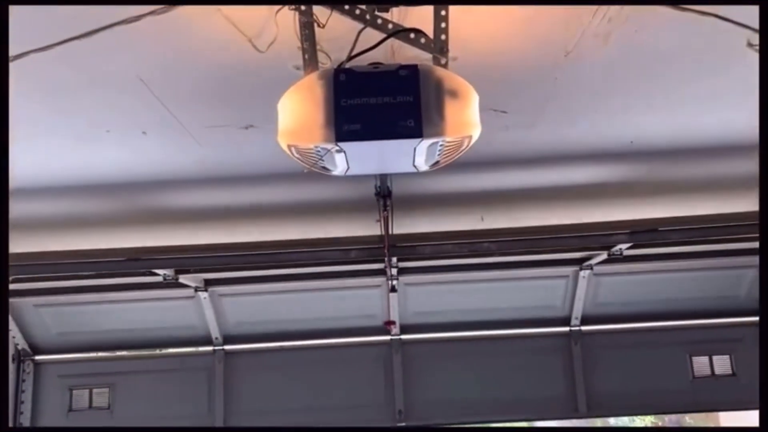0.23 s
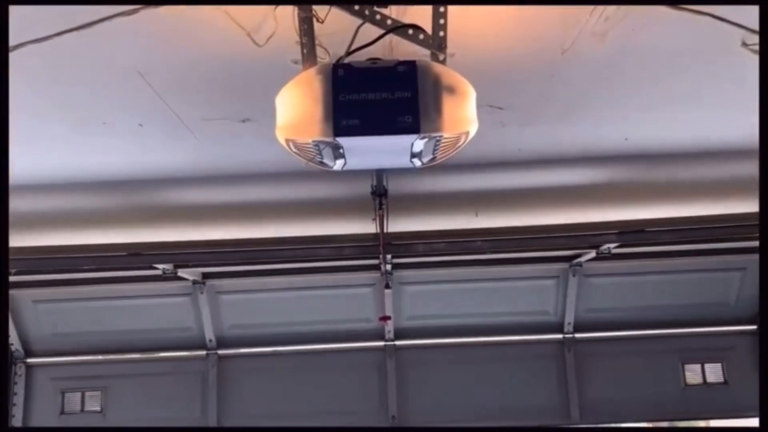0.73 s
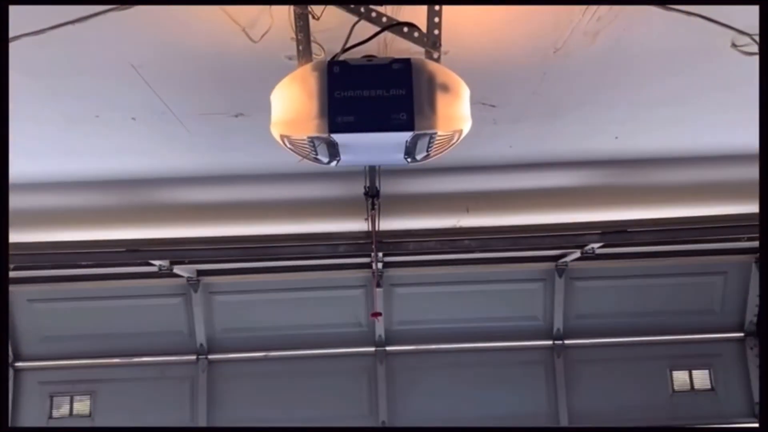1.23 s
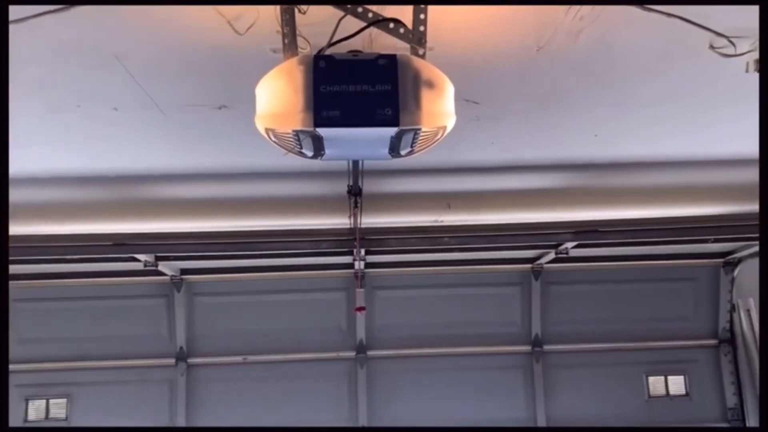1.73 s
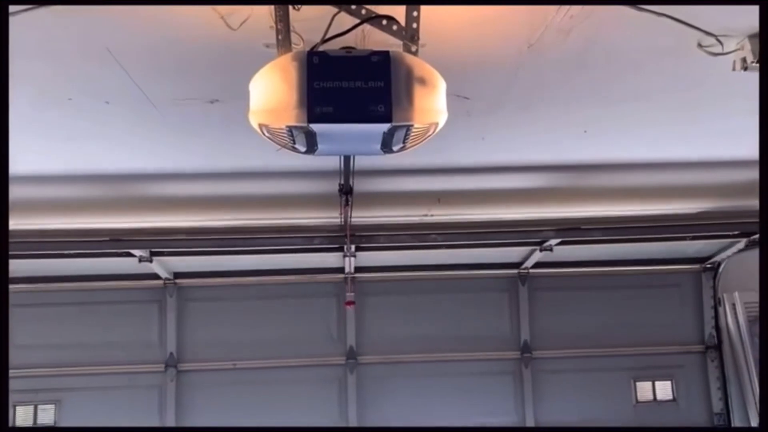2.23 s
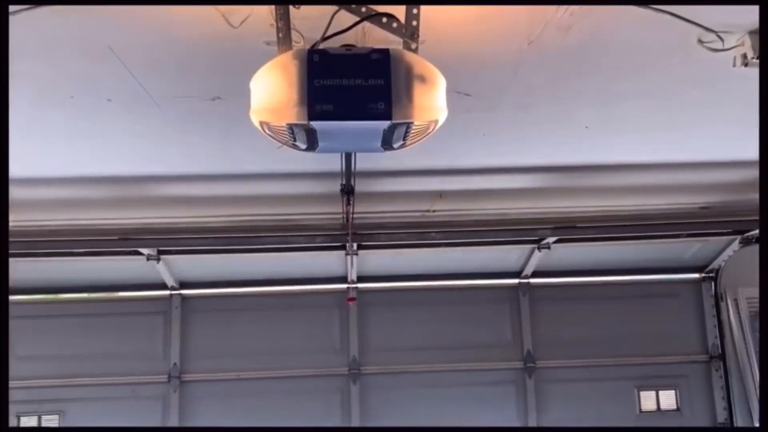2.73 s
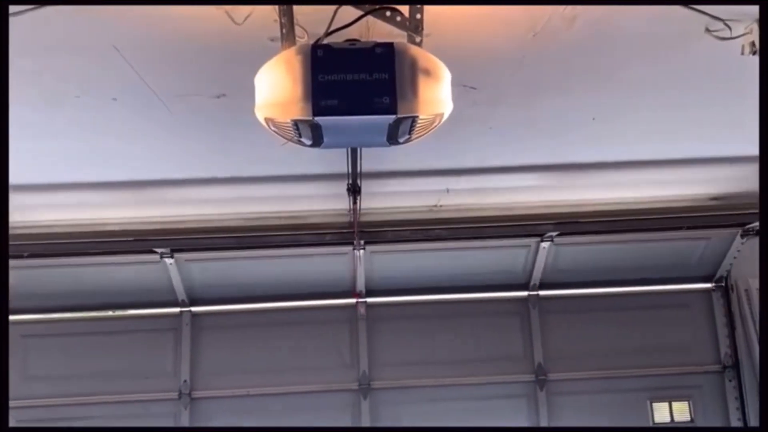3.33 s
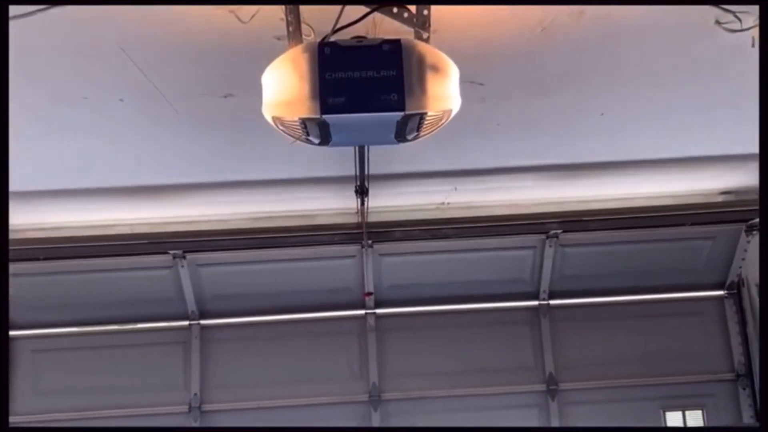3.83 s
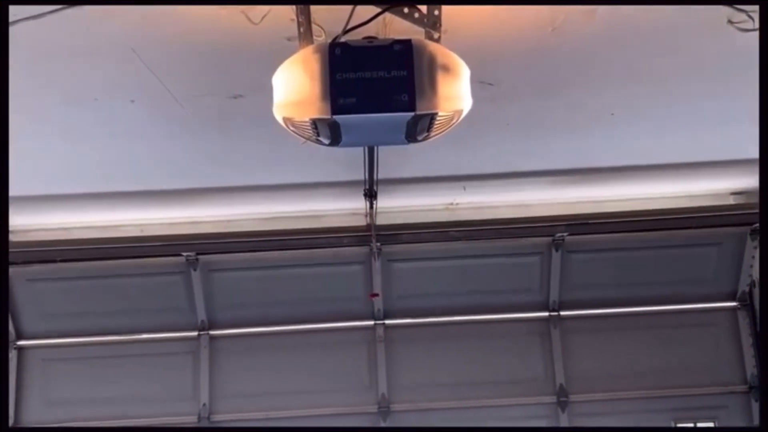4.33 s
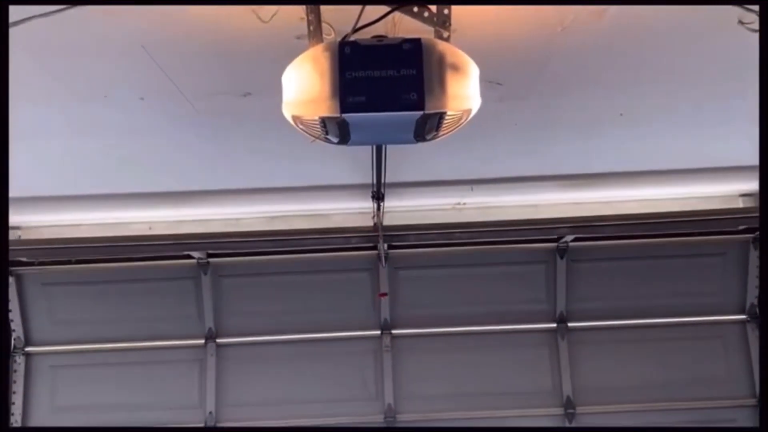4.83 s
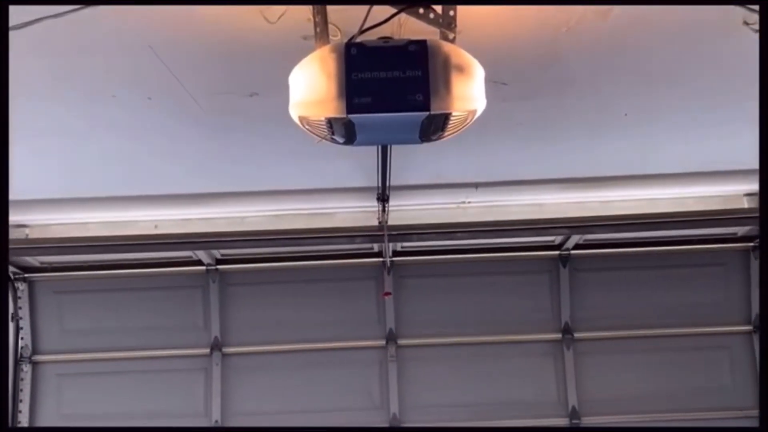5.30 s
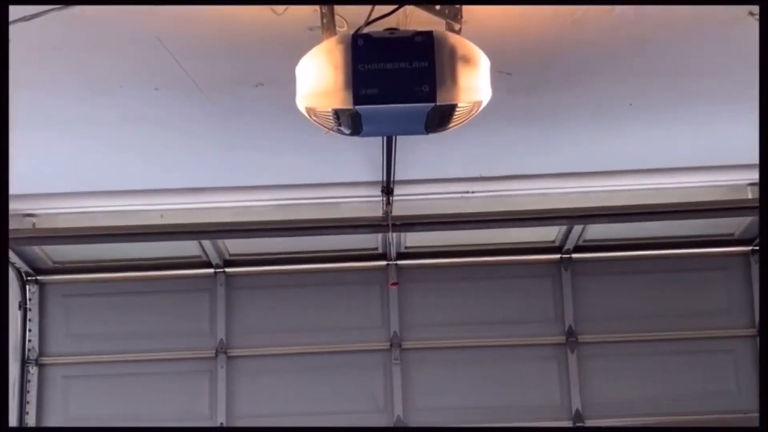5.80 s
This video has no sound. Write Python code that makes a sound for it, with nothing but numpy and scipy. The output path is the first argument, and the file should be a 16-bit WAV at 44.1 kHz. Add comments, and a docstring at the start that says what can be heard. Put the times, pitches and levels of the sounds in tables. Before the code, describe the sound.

Inside an echoing garage, a motor's mains hum and a rolling, gritty rumble continue from start to end. Light clicks and thuds come first, then a clank at 1.6 seconds, a loud ringing clatter around 2.4 and a sharp metallic bang near 3.2. Later knocks are quieter until a small cluster near the end. Dry rollers squeak faintly; a stereo phone captures it from below.

```python
"""A motor hum and a rolling rumble run throughout, with a faint roller whistle: a ceiling-mounted opener lowers a
sectional steel door in a closed garage. The hum is a stack of multiples of twice the mains frequency, the travel is
coloured noise. Hinges, fittings and panels clank as each section turns into the upright track: noise bursts and
decaying modes, ringing on in the room. A phone with two microphone ports listens from below."""
import sys
import numpy as np
from scipy import signal
from scipy.fft import rfft, irfft, next_fast_len
from scipy.io import wavfile
from scipy.ndimage import uniform_filter1d, map_coordinates

SR = 44100
rng = np.random.default_rng(int(sys.argv[2]) if len(sys.argv) > 2 else 0)


def master(y):
    """Save y as 16-bit WAV."""
    cut = np.clip(np.atleast_2d(y).T, -1, 1)
    pcm = np.round(cut * 32767)  # scale
    wavfile.write(sys.argv[1], SR, pcm.astype(np.int16))


N = 267201

# Modes of a hinge pin. Each row: frequency in Hz, relative level in dB, t60 in seconds.
PIN = [(2577, 0, .15), (2214, -9, .15), (4520, -6, .07)]


def amp(db):
    """dB to gain."""
    return 10 ** (np.asarray(db) / 20)


def unit(x):
    """x at rms 1."""
    return x / np.sqrt(np.mean(x ** 2) + 1e-20)


def along(points, hz):
    """Values at hz, read from (Hz, value) points on a log frequency axis."""
    f, v = np.transpose(points)
    return np.interp(np.log(hz + 1), np.log(f + 1), v)


def curves(rows):
    """One value per sample for each column after the time."""
    s, *cols = np.transpose(rows)
    return [np.interp(np.arange(N) / SR, s, c) for c in cols]


def wobble(rate):
    """A smooth random curve, rate knots a second."""
    knots = rng.standard_normal(int(N * rate / SR) + 4)
    return map_coordinates(knots, [np.arange(N) * rate / SR])


def swell(start, length, edge):
    """Rises, holds and fades between 0 and 1 (times in seconds)."""
    t = np.arange(N) / SR - start
    rise, fall = t / edge + .5, (length - t) / edge + .5
    return np.clip(np.minimum(rise, fall), 0, 1) ** 2


def coloured(x, spectrum):
    """x through a (Hz, dB) spectrum, at rms 1."""
    n = x.shape[-1]
    m = next_fast_len(n + 2048)
    gain = amp(along(spectrum, np.fft.rfftfreq(m, 1 / SR)))
    return unit(irfft(rfft(x, m) * gain, m)[..., :n])


def rush(spectrum, patchy_db):
    """Two unrelated noises of one colour, sharing patches of random gain in time and frequency."""
    z = signal.stft(rng.standard_normal((2, N)), nperseg=512)[2]
    field = uniform_filter1d(rng.standard_normal(z.shape[1:]), 6, 0)
    field = uniform_filter1d(field, 12, 1)
    patchy = signal.istft(z * amp(patchy_db * unit(field)), nperseg=512)[1][:, :N]
    return coloured(patchy, spectrum)


def ringing(modes, t, scatter_db):
    """Decaying modes, each at a new strength."""
    hz, db, t60 = np.transpose(modes)[:, :, None]
    level_db = db + rng.normal(0, scatter_db, hz.shape)
    return np.sum(amp(level_db - 60 * t / t60) * np.sin(2 * np.pi * hz * t), axis=0)


def garage(length):
    """A fresh pair of room tails; each frequency dies at its own speed."""
    # Decay of the garage. Each row: frequency in Hz, t60 in seconds.
    decay = [(60, 0.99), (300, 0.95), (1000, 0.48), (3000, 0.45), (8000, 0.28), (15000, 0.26)]
    hz, t, z = signal.stft(rng.standard_normal((2, length)), SR, nperseg=256)
    fading = z * amp(-60 * t / along(decay, hz)[:, None])
    tail = signal.istft(fading, SR, nperseg=256)[1][:, :length]
    return tail / np.linalg.norm(tail[0])


def motor():
    """Magnetic pull shakes the housing at multiples of twice the mains, in step; the drive adds a gliding tone."""
    # The hum. Each row: time in seconds, mean levels of the 1st, 2nd and 3rd multiple in dB.
    hum_levels = [(0.0, -33, -45, -40), (0.05, -37, -47.5, -38), (0.74, -39, -46, -38),
                  (0.89, -36, -55, -41), (1.23, -43.5, -45, -41), (1.37, -39, -57, -41.5),
                  (1.47, -68, -51, -43.5), (1.69, -35.5, -49, -42.5), (1.82, -45, -50, -45.5),
                  (2.38, -46, -48.5, -44), (2.45, -52, -44, -41.5), (2.58, -49, -69, -43),
                  (2.83, -42, -52, -46), (2.92, -47.5, -53, -42.5), (3.14, -39.5, -50, -40),
                  (3.19, -35, -67, -44), (3.31, -40.5, -41.5, -49.5), (3.49, -41, -72, -40.5),
                  (3.73, -43, -47, -48), (3.9, -39, -52.5, -53.5), (4.51, -43.5, -57, -40.5),
                  (4.94, -41.5, -44.5, -47.5), (5.06, -36, -53, -43), (5.18, -46, -48, -48.5),
                  (5.47, -40, -54, -48.5), (5.6, -53, -69, -50.5), (5.75, -38, -63, -39),
                  (5.96, -65, -50, -52), (6.01, -48, -58, -55), (6.06, -55, -66, -53)]
    # The faint tone of the drive. Each row: time in seconds, pitch in Hz, mean level in dB.
    whine = [(0, 311, -53), (.6, 316.5, -48.5), (1.15, 326, -58), (1.4, 326.6, -50.5), (3.2, 314, -60),
             (3.6, 317.6, -50), (4.1, 320, -53), (4.5, 330.4, -55), (4.8, 332.6, -57), (6.06, 332.7, -55)]
    hum_hz = 119.97
    turn = 2 * np.pi * hum_hz * np.arange(N) / SR + .3 * wobble(6)
    tones = []
    for multiple, db in enumerate(curves(hum_levels), start=1):
        size = amp(db + 1.03 * wobble(14))
        tones.append(size * np.cos(multiple * turn + 0.31 * wobble(8.9)))
    whine_hz, whine_db = curves(whine)
    whine_turn = 2 * np.pi * np.cumsum(whine_hz) / SR + 0.6 * wobble(10)
    tones.append(amp(whine_db + 2.8 * wobble(7.3)) * np.sin(whine_turn))
    return np.sqrt(2) * sum(tones) * np.array([[1], [0]])  # first arrival only


def travel():
    """Gears, trolley and rollers: rumble, drone of the rail, rolling and scraping in the tracks, hiss."""
    # The run of the door. Each row: time in seconds, then shaking of the rail, grip of the rollers,
    # scraping and hiss in dB, each before the trim of its layer.
    roll = [(0.0, -46, -48, -56, -61), (0.96, -42.5, -49, -52, -59), (1.27, -49.5, -48.5, -54.5, -60),
            (1.55, -40.5, -45, -49, -61), (1.69, -40, -45, -52, -57.5), (1.92, -45.5, -47.5, -54, -58.5),
            (2.19, -45, -48, -49, -57), (2.53, -42, -41, -47.5, -63), (2.82, -46.5, -47, -53, -59),
            (3.05, -42, -45.5, -46, -58.5), (3.22, -40, -43, -49.5, -64.5),
            (3.49, -41.5, -47.5, -53, -61.5), (3.95, -47.5, -51, -54.5, -61),
            (4.56, -45.5, -52, -57.5, -60.5), (4.91, -45, -51, -56.5, -59.5),
            (5.6, -49.5, -48.5, -51.5, -57.5), (5.8, -47, -43.5, -50.5, -57.5),
            (6.06, -40.5, -48, -48.5, -59)]
    # Colours of the five layers. Each row: frequency in Hz, relative density in dB per Hz.
    rumble_colour = [(16, -28), (26, -11), (45, -0.5), (65, 3), (95, 5.5), (112, 1), (170, -35.5)]
    drone_colour = [(70, -35), (110, -1.5), (135, 2), (175, -1.5), (205, -6), (270, -3), (292, -4.5),
                    (316, -4.5), (345, -6.5), (420, -15.5), (600, -19.5), (900, -58)]
    rolling_colour = [(200, -61), (400, 1), (520, -2), (700, -2.5), (850, -0.5), (1100, -3.5), (1500, -7.5),
                      (2400, -29)]
    scraping_colour = [(900, -30), (1500, -1.5), (1900, 3), (2300, -1.5), (2800, -3), (3400, -13),
                       (5500, -22)]
    hiss_colour = [(1500, -26), (3000, 2.5), (4300, -0.5), (5500, -3.5), (6300, 0), (8000, 1), (10000, 2.5),
                   (11500, -2.5), (13500, -0.5), (16500, -4.5)]
    rumble_follows = 0.66  # dB per dB of the rail
    rail_db, grip_db, scraping_db, hiss_db = curves(roll)
    shake = rail_db - rail_db.mean()
    judder = wobble(12)  # uneven travel shakes the brighter layers together
    rumble_db = -46.5 + rumble_follows * shake + 0.31 * wobble(5.14)
    rumble = amp(rumble_db) * rush(rumble_colour, patchy_db=-0.3)
    drone = amp(rail_db + 1.23 + 0.51 * wobble(15.0)) * rush(drone_colour, patchy_db=1.0)
    rolling = amp(grip_db + 2.0 + 0.5 * judder) * rush(rolling_colour, patchy_db=2.0)
    scraping = amp(scraping_db + 1.1 + 0.19 * judder) * rush(scraping_colour, patchy_db=3.0)
    flicker_db = 0.12 * judder + 1.56 * wobble(21.95)
    hiss = amp(hiss_db + 7.5 + flicker_db) * rush(hiss_colour, patchy_db=3.5)
    return rumble + drone + rolling + scraping + hiss


def whistle():
    """A dry roller straight ahead sings a thin gliding tone in uneven bursts, nearly in step at both ports."""
    # Pitch of the roller, climbing with each section and dropping back. Each row: time in seconds, pitch in Hz.
    glide = [(0, 897), (.35, 907), (.76, 925), (1.1, 975), (1.2, 997), (1.28, 1012), (1.45, 1020),
             (1.65, 1047), (1.8, 1036), (1.95, 1032), (2.1, 1048), (2.5, 1025), (2.6, 1000), (2.67, 1002),
             (2.76, 1030), (2.9, 1005), (3.0, 975), (3.47, 955), (3.53, 899), (4.08, 944), (4.35, 979),
             (4.6, 989), (4.92, 1021), (5.2, 1053), (5.55, 1062), (6.06, 1082)]
    # Faint steady levels of multiples 1 to 4, in dB.
    steady_db = -80, -74, -76, -73
    # One multiple sings out: a list for each of multiples 1 to 4.
    # Each row: start in seconds, length in seconds, level in dB.
    squeaks = [
        [(4.04, .22, -57.5), (5.6, 0.5, -54)],
        [(-.03, .45, -58), (.44, .38, -65), (3.48, 0.13, -60), (4.1, .22, -66), (4.4, .16, -67),
         (5.26, .12, -67)],
        [(.62, 0.097, -63), (3.4, 0.064, -58), (4.38, .2, -68.5), (4.725, .065, -59)],
        [(1.19, .1, -61.5), (1.3, .08, -68), (1.44, 0.12, -73), (1.68, .07, -69), (1.77, .22, -64),
         (2.02, 0.23, -73), (2.55, .12, -60), (2.7, 0.11, -66), (2.88, 0.13, -66), (4.3, 0.047, -71),
         (4.63, .035, -59), (4.69, 0.1, -60.5), (4.8, 0.16, -65), (5.02, 0.1, -69), (5.16, .04, -63),
         (5.32, 0.17, -68), (5.485, 0.054, -57), (5.545, 0.07, -64), (5.67, .08, -73), (5.9, .17, -67)],
    ]
    turn = 2 * np.pi * np.cumsum(curves(glide)[0]) / SR + .3 * wobble(50)
    sizes = []
    for db, rows in zip(steady_db, squeaks):
        bursts = sum(amp(loud_db) * swell(s, length, edge=.03) for s, length, loud_db in rows)
        sizes.append(amp(db) + bursts)

    def at_port():
        """The multiples with this port's own small wavering of level and phase."""
        tones = 0
        for multiple, size in enumerate(sizes, start=1):
            wavering = amp(.9 * multiple * wobble(45))
            tones = tones + size * wavering * np.sin(multiple * (turn + .15 * wobble(12)))
        return np.sqrt(2) * tones

    return np.array([at_port() for _ in range(2)])


def booms():
    """The whole door leaf and the air of the garage sound deep, unsteady notes."""
    # Deep notes. Each row: start in seconds, length in seconds, pitch in Hz, mean level in dB.
    deep_notes = [(0.03, 0.61, 77.4, -41), (0.816, 0.13, 77, -38), (1.228, 0.12, 94.5, -38),
                  (1.58, 0.21, 90, -48), (1.68, 0.32, 53, -44), (2.404, 0.18, 90.2, -45),
                  (2.485, 0.095, 77, -39), (2.6, 0.12, 175, -39), (2.592, .11, 289.8, -35),
                  (4.1, 0.13, 247.7, -42.5), (2.55, 0.54, 52.6, -42), (3.1, .15, 86.8, -40),
                  (3.5, 0.2, 53, -44), (4.22, 0.12, 77.7, -47), (5.88, 0.18, 89.7, -43)]
    t = np.arange(N) / SR
    notes = 0
    for s, length, hz, db in deep_notes:
        size = amp(db + 0.76 * wobble(7.9)) * swell(s, length, edge=0.15)
        notes = notes + size * np.sin(2 * np.pi * hz * t + 0.93 * wobble(8.2))
    return np.sqrt(2) * notes * np.array([[1], [0]])  # first arrival only


def knocks():
    """Each knock is a short rattle that shakes the parts of the door and its modes, heard mostly through the room."""
    # Knocks of the door. Each row: start in seconds, clank strength in dB, then thud, panel, hinge, edge
    # and jingle in dB against the clank, all before the trims below.
    strikes = [(0.2577, -42, -4, 13, 4, 1, -5.5), (0.3, -41.5, 16, 12.5, 2, -10, -21),
               (0.405, -45.5, 2, 6, 6, -4, -15), (0.7855, -40.5, 6, 6.5, -3, 2.5, 3),
               (0.8049, -37.5, 1, 1, -8, -6, -19), (0.978, -40, -3, -11, -9, -4.5, -7),
               (1.1778, -40, 10, 8, 0, -4, -4), (1.3789, -38, -7, -3, -17, -24, -13),
               (1.61, -33, -5, -1, -4, -1.5, -9.5), (1.6193, -30, 6.5, 0, -9, -9, -18),
               (1.6587, -48, 16, 10, -9, -8, -8), (1.699, -46, 0, 12, 2, -4, -23),
               (1.8179, -48, 16, -2, 0, 6.5, -18), (2.1266, -37, 1, 4.5, -15, -23, -25),
               (2.2875, -36.5, 1, 0, 0, -14, -31), (2.353, -37, -10, -6, 0, 5, -10),
               (2.3731, -25.5, -3.5, 6.5, 0, -9, -24), (2.3925, -27.5, -12, 2, -9, -4, -29),
               (2.4088, -29.5, 12.5, 1, -2.5, -6, -26), (2.4598, -34, 10, 12, -12, -6, -26),
               (2.5389, -43, 2, 15, -1, 0, -25), (2.6183, -35.5, 15.5, 6.5, -3, -12, -31),
               (2.651, -37.5, 13, 4, -2, -6, -29), (2.789, -38, 7, -3, -4, -2.5, -8.5),
               (3.0884, -45, 20.5, 12.5, -11, 7, -25), (3.178, -34, -7, 1, 2, 1, -16),
               (3.197, -24, -9, -2.5, -15, -5, -18), (3.2113, -30.5, -19, 5.5, -4, -3, -19),
               (3.226, -41, -5, 0, -8, -1, -15), (3.2441, -36, 7, -6, 0, -16, -22),
               (3.329, -41.5, -4, 9, -22, -2, -17), (3.6613, -34, 0, 5, -6, 1.5, -9),
               (3.7597, -46, 16, -5, 4.5, 4, 3.5), (3.8103, -44.5, -7, -4, 0, -5, -7),
               (4.1086, -45.5, 15, 8.5, -9, -1, -14), (4.5751, -47.5, 12, 13, 4, 7.5, -4),
               (4.5955, -39.5, -4, 9.5, -1.5, -3, -13), (5.1603, -45, -14, -13, -3, -10, -20),
               (5.2369, -34.5, -1, 6, -5, -3, -27), (5.5386, -47.5, 23, 3, 4, -9, -20),
               (5.685, -35, 6, -5, 4, -15, -20), (5.73, -38.5, 14, 11.5, 2, -8, -24),
               (5.755, -46, -2, 6, 0, -12, -22), (5.788, -38, 15.5, 8, 0, -10, -20),
               (5.83, -44, 12, 0, -7, -12, -22), (5.9004, -42, -7, -16, -6, -17, 0)]
    # Panel modes. Each row: frequency in Hz, relative level in dB, t60 in seconds.
    steel = [(840, -5, .2), (1098, -8, .2), (1184, -3, .15), (1421, -4, .2), (1480, -8, .2),
             (1606, -5, .15), (1735, -5, .15), (1850, -8, .2), (2020, -9, .2), (2443, -8, .2),
             (2816, -10, .2), (4033, -16, .15), (4430, -13, .12), (5024, -17, .15)]
    # Colours of the six parts. Each row: frequency in Hz, relative density in dB per Hz.
    thud = [(30, -42), (50, -4.5), (170, -7), (300, -3), (450, -23), (800, -63)]
    panel = [(250, -64), (480, -1.5), (900, -1), (1400, -4.5), (1900, -16), (3000, -41)]
    clank = [(900, -29), (1400, -0.5), (1700, 10.5), (2200, -1.5), (3200, -33)]
    hinge = [(1600, -46), (2250, 2.5), (2575, 1), (2850, -2), (3200, -7.5), (4200, -27)]
    edge = [(2400, -30), (3400, -1.5), (4500, -4.5), (5200, -5.5), (6500, -12.5), (9000, -20.5)]
    jingle = [(4500, -26), (7000, -1.5), (10000, 0), (13000, 0), (16500, 0)]
    parts = thud, panel, clank, hinge, edge, jingle
    decay_s, rise_s, grain_db = 0.015, 0.0017, 4  # grain: unevenness of the small contacts
    out, t = np.zeros((2, N + 2 * SR)), np.arange(SR // 4) / SR
    onset = 1 - np.exp(-t / rise_s)
    fade = np.exp(-t / decay_s) * onset
    for s, db, thud_db, panel_db, hinge_db, edge_db, jingle_db in strikes:
        levels = thud_db - 5.5, panel_db - 3.0, -.7, hinge_db + 0.5, edge_db - .8, jingle_db + 10.0
        grains = np.repeat(rng.standard_normal(len(t) // 100 + 1), 100)[:len(t)]
        contacts = fade * amp(grain_db * grains)
        rattle = 0
        for part, level in zip(parts, levels):
            rattle = rattle + amp(level) * coloured(contacts * rng.standard_normal(len(t)), part)
        rattle = fade.std() * rattle
        panel_modes = amp(-11) * ringing(steel, t, scatter_db=2.5)
        pin_modes = amp(hinge_db - 10.0) * ringing(PIN, t, scatter_db=2.0)
        blow = amp(db - 1.5) * (rattle + (panel_modes + pin_modes) * onset)
        heard = signal.fftconvolve(blow[None], garage(SR * 3 // 4), axes=1)
        heard[0, :len(t)] += amp(-6.5) * blow  # direct sound, in the first arrival only
        out[:, round(s * SR):][:, :heard.shape[1]] += heard
    return out[:, :N]


def clinks():
    """Fittings and hinge pins ring briefly, straight at both ports and again through the room."""
    # Small loose fittings, each at its own pitch. Each row: start in seconds, middle partial in Hz,
    # its typical level in dB, t60 in seconds.
    fittings = [(.268, 1100, -48, 0.073), (.282, 795, -38.5, 0.13), (.295, 2980, -46, 0.072),
                (.786, 8750, -48, .05), (.79, 13000, -46, .06), (.8, 10300, -50, .05),
                (1.611, 13500, -50, .05), (2.38, 1157, -31, 0.09), (2.38, 850, -31.5, 0.11),
                (2.39, 1620, -31, .08), (2.41, 1384, -31.5, 0.13), (5.16, 1730, -50, 0.12),
                (5.49, 1250, -46.5, .12), (1.611, 2853, -41, .07), (1.62, 2223, -43, .07),
                (1.631, 1174, -36.5, .15), (3.18, 2900, -41, .06), (3.203, 1674, -35, 0.11),
                (3.22, 1413, -32, .1), (3.204, 3850, -42, .1), (3.212, 6944, -42, .07),
                (3.221, 4430, -37, .1), (3.662, 4786, -46, 0.093), (3.663, 1567, -47, 0.13),
                (4.577, 2961, -51, .07), (4.578, 3750, -52, 0.055), (4.594, 4400, -46, .08),
                (4.594, 4720, -47, .1), (5.16, 2950, -48, 0.071), (5.24, 2950, -43, .06)]
    # A hinge pin is struck hard. Each row: start in seconds, level in dB.
    pings = [(2.352, -27.5), (2.372, -29), (5.55, -45), (5.69, -42), (5.78, -44)]
    spread, room_db, rise_s = 0.0196, -3, .003  # spread: relative detuning of the three partials
    out, t = np.zeros((2, N + 2 * SR)), np.arange(SR // 4) / SR
    rings = []
    for s, hz, db, t60 in fittings:
        partials = [(hz * (1 + spread * step), db - 5 * abs(step), t60) for step in (-1, 0, 1)]
        rings.append((s, ringing(partials, t, scatter_db=4.0)))
    for s, db in pings:
        rings.append((s, amp(db) * ringing(PIN, t, scatter_db=3.5)))
    for s, ring in rings:
        ring = ring * (1 - np.exp(-t / rise_s))
        heard = amp(room_db) * signal.fftconvolve(ring[None], garage(SR // 2), axes=1)
        heard[:, :len(t)] += ring
        out[:, round(s * SR):][:, :heard.shape[1]] += heard
    return out[:, :N]


def ports(arrivals):
    """Two unrelated arrivals of the room sound are mixed into two channels that share the bass and differ above it."""
    # Correlation of the two channels. Each row: frequency in Hz, correlation from 0 to 1.
    alike = [(30, .92), (60, 1), (250, 0.93), (400, 0.64), (520, 0.54), (800, 0.2), (1300, 0.48),
             (1650, 0.33), (2400, 0.22), (3300, 0.042), (4500, 0.037), (5900, 0.24), (7300, 0.063),
             (7800, 0.98), (8600, 1), (9400, 0.74), (10300, 0.76), (10800, 0.55), (11600, 0.77),
             (12100, 0.53), (12950, 0.91), (13800, .99), (14600, 0.52), (15300, 0.5)]
    # Balance of the channels. Each row: frequency in Hz, left minus right in dB.
    lean = [(50, 2.5), (100, -4), (200, -2), (400, 0), (1000, 0.3), (3500, -1), (5700, -2.5), (7300, 0.5),
            (9000, -0.4)]
    # Phase between the channels. Each row: frequency in Hz, lead of the left in half turns.
    lead = [(150, 0), (500, .1), (900, .32), (1250, .16), (1500, -.6), (2200, -.6), (4500, -.1), (5300, -1),
            (6300, -2), (6900, -2.1), (7650, -3), (9000, -3), (10350, -4), (11700, -4), (12550, -5),
            (14300, -5), (15150, -6)]
    m = next_fast_len(N + 4096)
    hz = np.fft.rfftfreq(m, 1 / SR)
    first, second = rfft(arrivals, m)
    turn = np.arccos(np.clip(along(alike, hz), 0, 1)) / 2
    shared, apart = first * np.cos(turn), second * np.sin(turn)
    # half of the balance and lead goes to each channel
    skew = amp(along(lean, hz) / 2) * np.exp(1j * np.pi * along(lead, hz) / 2)
    left, right = (shared + apart) * skew, (shared - apart) / skew
    return irfft(np.array([left, right]), m)[:, :N]


def scene():
    """The diffuse sound of the garage, with the whistle and clinks added straight at the ports."""
    diffuse = motor() + travel() + booms() + knocks()
    return ports(diffuse) + whistle() + clinks()


def record(dry):
    """A band limit: nothing at or above it passes."""
    top_hz = 15750
    m = next_fast_len(N + 4096)
    passed = np.fft.rfftfreq(m, 1 / SR) < top_hz
    return irfft(rfft(dry, m) * passed, m)[:, :N]


dry = scene()
out = record(dry)
master(out)
```